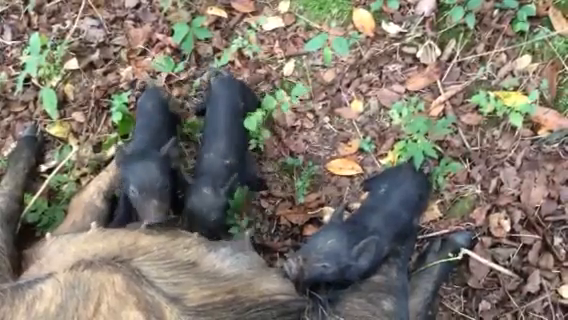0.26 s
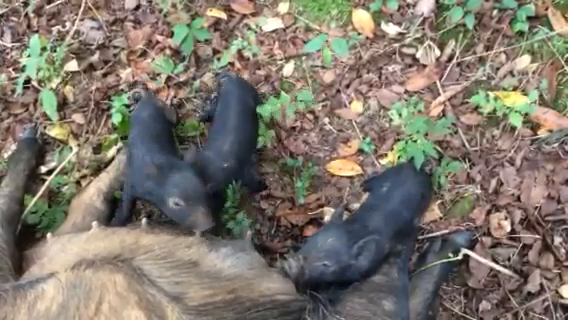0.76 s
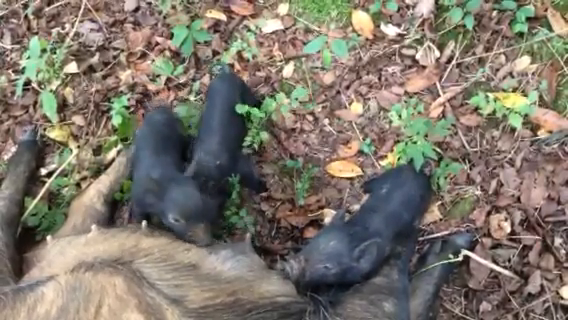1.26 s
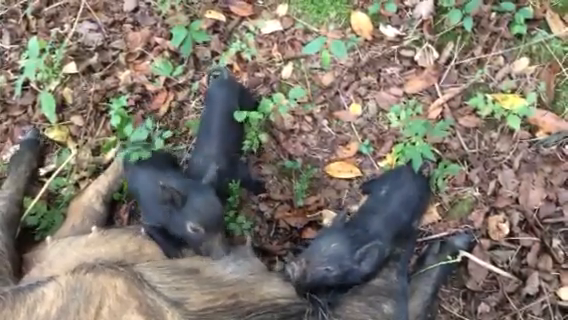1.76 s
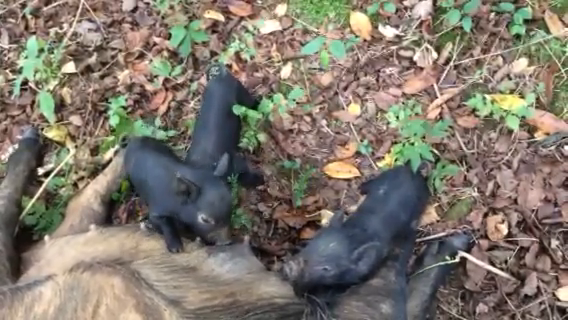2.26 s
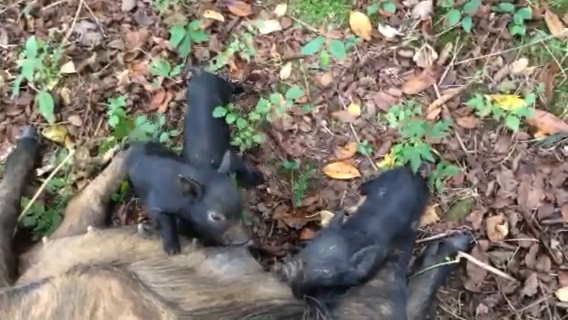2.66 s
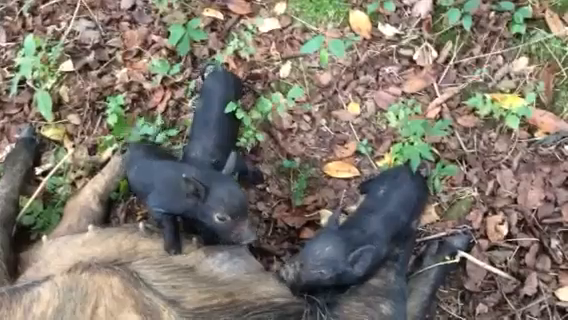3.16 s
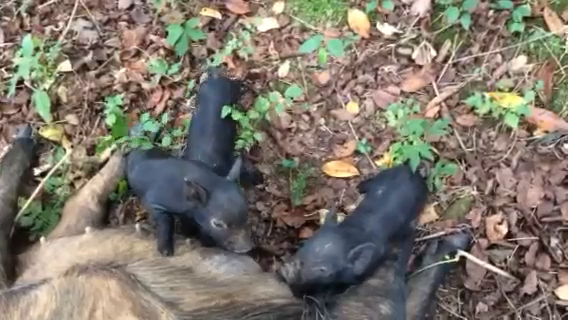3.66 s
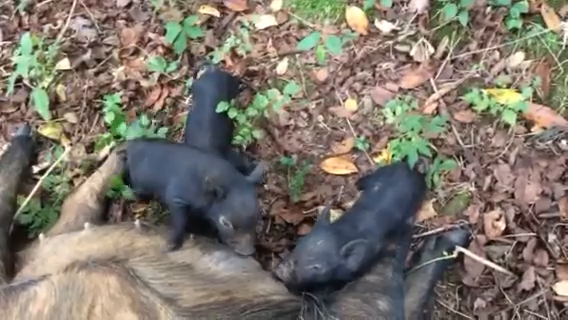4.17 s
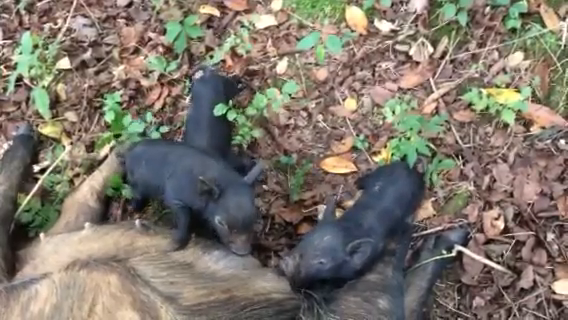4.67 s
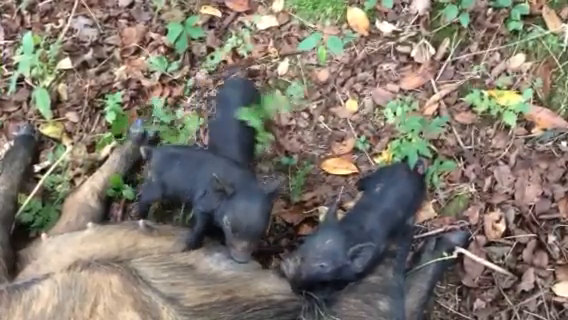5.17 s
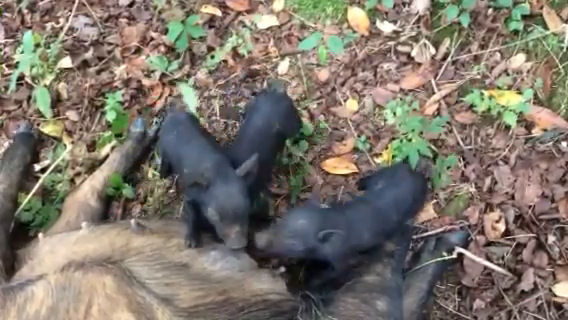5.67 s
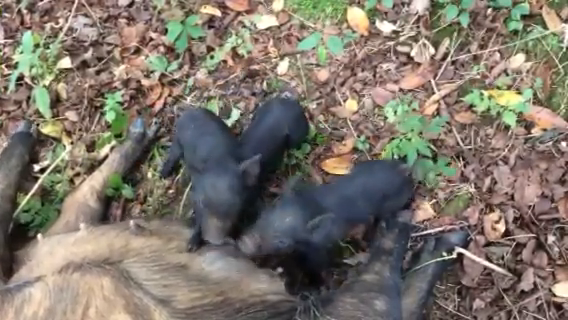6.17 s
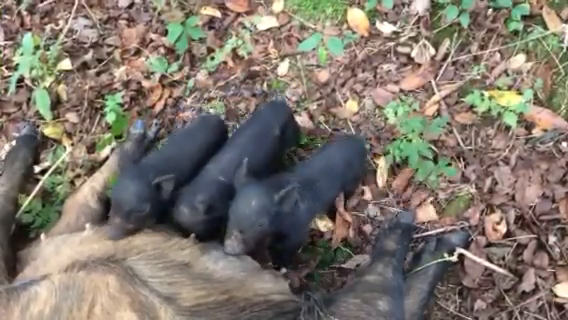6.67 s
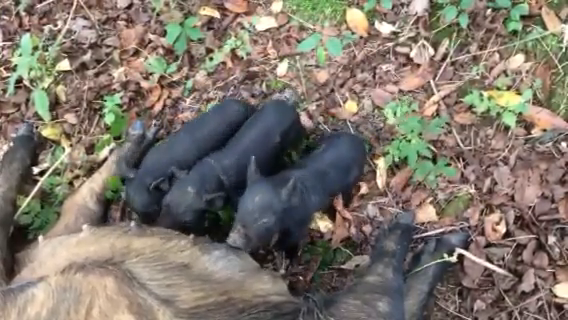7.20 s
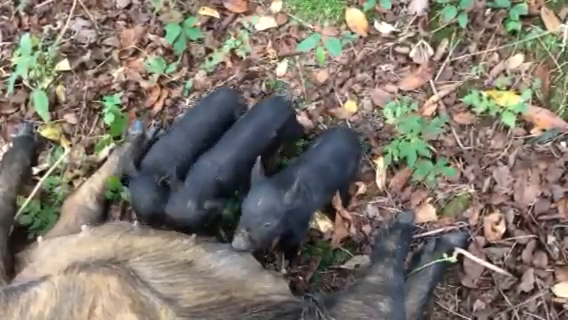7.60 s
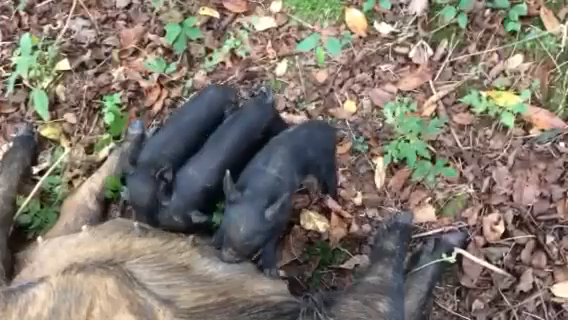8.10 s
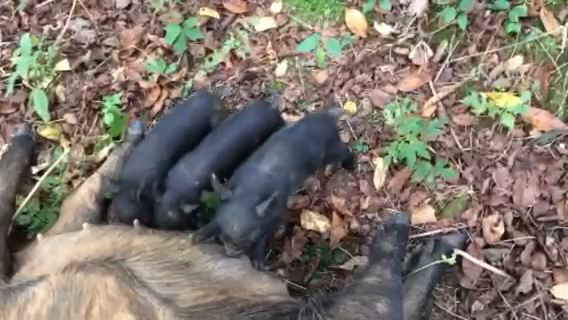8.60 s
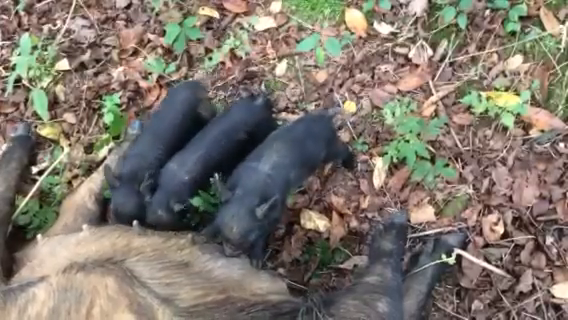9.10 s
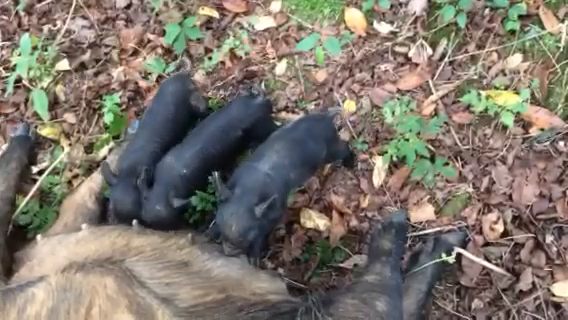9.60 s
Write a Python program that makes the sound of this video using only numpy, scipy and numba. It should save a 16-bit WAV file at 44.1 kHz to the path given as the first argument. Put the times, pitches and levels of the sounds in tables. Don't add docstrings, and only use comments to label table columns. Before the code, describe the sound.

Throughout, a dense, steady cicada hiss, brightest around 7 to 8 kHz, hangs over quiet low air and a very faint far machinery hum. From 0 seconds twigs snap and dry leaves rustle close to the phone under small hooves. Birds whistle softly at 0.3 to 0.6 seconds, and a short breathy grunt comes at 1.3, with a scuff just after. A rustle peaks at 2.6; a six-syllable high trill runs from 2.9 to 3.5. Faint dove-like calls sound at 4.4, 5.0 and 5.8, among more whistles. Stirring surges at 5.3 and again from 6.0 to 6.9, with a very sharp leaf crack at 6.2, small grunts from 5.6 and peeps at 6.0 and 6.6. Quick low grunts cluster at 7.1 to 7.7, ending with a hard smack. Another leafy burst comes at 8.3, a soft peep at 8.7, then lighter rustles and a quick warble near 9.4.

```python
import sys
import numpy as np
from scipy import signal
from scipy.fft import rfft, irfft
from scipy.io import wavfile
from scipy.ndimage import uniform_filter1d
from numba import njit

SR = 44100
rng = np.random.default_rng(int(sys.argv[2]) if len(sys.argv) > 2 else 0)


def boost(x):
    u = np.asarray(x, float) / 20
    return 10 ** u


def wrap_up_sound(samples):
    columns = np.atleast_2d(samples).T
    tamed = np.clip(columns, -1, 1)
    steps = np.round(tamed * 32767).astype(np.int16)
    wavfile.write(sys.argv[1], SR, steps)


N = 434385

# frequency in Hz, density in dB per Hz.
CICADA_SPECTRUM = [(3410, -37), (5800, -32), (6170, -27), (6620, -9), (6890, -0.5), (7330, 4), (7670, 2),
                   (8360, -9), (9190, -26.5), (9620, -30.5), (10700, -30.5), (12800, -34), (14500, -16),
                   (15500, -29.5)]
# frequency in Hz, density in dB per Hz.
AIR_SPECTRUM = [(15, -30), (25, -17.5), (49, -7), (70, -2.5), (197, -5.5), (259, -9), (366, -6.5),
                (695, -17.5), (1050, -17.5), (1590, -21), (2450, -22.5), (3090, -24.5), (3540, -26),
                (4880, -29.5), (6000, -29.5), (7800, -55), (13200, -120)]
# line in Hz, level in dB, wander in Hz.
MACHINE_LINES = [(59.4, -71.5, 0.49), (86.3, -76, 2.93), (119.4, -76.5, 0.53), (187.3, -83.5, 1.935),
                 (361, -87, 0.45)]

# time in seconds, treble rustle in dB.
UNREST = [(0, -77), (.9, -79), (1.6, -76), (2.1, -83), (3.3, -79), (4.6, -80), (5.2, -73.5), (5.5, -68.5),
          (6.0, -82), (6.6, -68.5), (7.1, -73.5), (7.55, -78), (7.8, -64.5), (8.2, -72.5), (8.9, -75.5),
          (9.85, -76)]
# loudest at in seconds, treble rustle in dB,
# swell from -12 dB in seconds, middle minus treble in dB.
STIRS = [(.224, -73.5, 0.5, -8), (.38, -70.5, 0.3, -5), (.99, -73, 0.2, -6), (1.17, -71.5, 0.22, -5),
         (1.457, -62, 0.07, -3.5), (1.65, -68, -0.06, -1), (1.8, -71.5, 0, -3), (2.41, -75, 0.5, -11),
         (2.579, -60, .055, -8.5), (3.637, -71, 0.24, -8), (3.99, -72, -0.14, -6),
         (4.161, -67.5, 0.2, -4.5), (4.33, -72, 0, -5), (4.52, -68, -0.44, -5), (4.95, -72, 0, -5),
         (5.305, -57.5, 0.0569, -5), (5.737, -72, 0.37, -2), (5.95, -70, 0.22, -1.5),
         (6.066, -60.5, .05, -5.5), (6.226, -62.5, 0, -7), (6.351, -61.5, 0.13, -4), (6.429, -55, 0.08, -5),
         (6.55, -66.5, 0.13, -3), (6.67, -63.5, 0.16, -5.5), (6.849, -62.5, 0.08, -6), (7.53, -72, 0.2, -4),
         (8.012, -67, .05, -7), (8.325, -55, 0.08, -8.5), (8.73, -68, 0.23, -10), (9.264, -70, 0.43, -4.5)]

# start in seconds, peak in dB, ring in Hz.
TWIGS = [(0.0745, -38, 4160), (0.2173, -43, 3600), (0.4723, -50.5, 2320), (0.766, -50, 3400),
         (1.0765, -53, 5250), (1.601, -48, 2960), (1.7355, -50, 5670), (3.412, -53.5, 3700),
         (3.5608, -55, 4430), (3.59, -56, 2950), (3.639, -47.5, 5580), (3.705, -49.5, 5030),
         (4.1035, -53, 2610), (4.31, -45, 5410), (4.3326, -52, 5690), (4.3535, -49.5, 5910),
         (6.134, -49, 5000), (6.1928, -52, 3420), (6.4847, -51, 5500), (6.684, -49, 2350),
         (6.7384, -51, 2580), (6.8068, -50, 2580), (6.9556, -39, 4700), (7.1222, -50, 2790),
         (7.3988, -48, 4080), (4.311, -54, 2500), (4.335, -55, 2900), (4.278, -58, 2500), (4.66, -56, 2700),
         (9.218, -56, 2100), (8.219, -57, 3800), (7.3986, -50, 2600), (2.87, -55, 2450),
         (6.0666, -48, 3630), (6.2208, -51, 2880), (6.8433, -50, 4640), (7.1, -56, 2700),
         (7.157, -57, 3500), (7.34, -56, 3500), (7.5143, -57, 2300), (6.0531, -52, 5390),
         (1.038, -55, 4900), (1.093, -55, 2800), (7.795, -50, 2660), (8.2407, -53, 4300),
         (8.9316, -56, 3990), (9.1277, -51, 3210)]
# start in seconds, peak in dB, ring in Hz.
LEAVES = [(0.2608, -49.5, 12600), (0.9834, -42, 10200), (2.3989, -48, 11000), (3.6386, -46, 13400),
          (4.0891, -50, 9440), (5.3915, -41, 11100), (6.0536, -53, 12800), (6.22, -28, 10600),
          (6.2252, -37, 12500), (6.432, -36, 12900), (7.711, -39, 9780), (8.3125, -41, 12600),
          (9.2643, -46, 9350)]
# start in seconds, peak in dB, ring in Hz.
SMACKS = [(0.265, -52.5, 1130), (0.44, -64, 850), (0.664, -64, 800), (1.45, -51, 1080), (1.485, -56, 337),
          (1.484, -53, 1250), (2.596, -65, 301), (3.634, -57.5, 926), (3.775, -61.5, 900),
          (4.023, -62, 337), (4.023, -56.5, 1120), (4.724, -51.5, 1050), (4.8653, -58.5, 2490),
          (4.9087, -57, 2700), (5.041, -58, 795), (5.872, -47, 900), (5.875, -44, 1040), (6.162, -57, 1060),
          (6.755, -60, 352), (7.514, -66, 349), (7.516, -60, 1100), (7.122, -61, 1200), (7.399, -62, 1200),
          (7.254, -63, 980), (7.709, -46.5, 1150), (7.7093, -34, 2500), (7.7095, -41, 3550),
          (6.382, -56, 1850)]
# start in seconds,
# peak in dB, centre in Hz, t60 in seconds.
SCUFFS = [(1.44, -48, 2900, 0.091), (1.48, -62, 2500, 0.087), (4.14, -47, 4220, 0.16),
          (4.452, -56, 4500, 0.23), (4.612, -49.5, 3200, 0.22), (4.7, -56, 2590, 0.088),
          (4.77, -60, 3900, 0.21), (4.83, -54, 3000, 0.068), (5.29, -39.5, 4200, .09),
          (5.312, -39.5, 3200, 0.12), (6.41, -49, 3100, .1), (7.7098, -37, 5600, 0.006),
          (7.712, -52, 420, .025), (8.305, -54, 3500, 0.14), (8.33, -47, 5000, .06),
          (8.57, -61, 1300, 0.23), (8.745, -59, 1300, 0.16), (9.03, -57, 1090, 0.23),
          (9.05, -55, 3200, 0.15)]

# start in seconds, length in seconds, first Hz, last Hz, peak in dB.
WHISTLER_NOTES = [
    (.342, 0.028, 2687, 2620, -60.5),
    (0.629, 0.077, 3170, 3570, -54.5),
    (1.497, 0.078, 2860, 3114, -59),
    (1.577, .045, 3130, 3040, -72),
    (2.467, 0.11, 2570, 2685, -69),
    (2.564, .135, 2695, 2577, -70),
    (5.183, 0.023, 2700, 2610, -61),
    (5.755, .045, 2950, 3180, -64),
    (5.8, 0.078, 3170, 3500, -57),
]
WARBLER_NOTES = [(.322, .02, 3000, 2750, -65), (.588, 0.027, 2910, 3510, -65),
                 (5.163, 0.022, 2900, 2730, -65), (7.28, .09, 2980, 2750, -77),
                 (7.425, .04, 2800, 2950, -76), (7.525, .055, 3200, 2950, -76),
                 (.295, 0.043, 2430, 2320, -76), (.405, 0.031, 2145, 2070, -66.5),
                 (.462, 0.034, 2100, 2390, -70), (.497, 0.1, 2396, 2860, -75),
                 (.578, 0.055, 2480, 1960, -71), (5.24, 0.024, 2130, 2010, -67),
                 (5.35, 0.034, 2800, 2450, -69), (5.385, .055, 2480, 2440, -71),
                 (5.44, 0.027, 2410, 1990, -65.5), (5.49, 0.041, 2070, 2160, -71),
                 (9.354, .018, 3780, 3100, -63), (9.385, 0.037, 3040, 2900, -73),
                 (9.42, .045, 2050, 2950, -63), (9.508, .032, 3280, 3080, -65),
                 (9.575, 0.044, 2900, 2540, -63.5), (9.62, .042, 2520, 1880, -67)]
CHIPPER_NOTES = [
    (4.762, .025, 3650, 3750, -71),
    (4.77, .035, 4150, 4000, -73),
    (4.78, .02, 3250, 3050, -75),
    (2.12, .05, 4550, 4650, -77),
    (2.175, 0.034, 3696, 3710, -64),
    (2.208, .018, 3590, 3180, -66),
    (2.226, 0.019, 3180, 3690, -68),
    (8.42, .025, 3680, 3390, -70),
    (8.965, .03, 5030, 4850, -75),
]
# share of the glide done when loudest if rising, the same if falling,
# loudest at share of length, start and end in dB against the peak.
WHISTLER_SHAPE = (0.6, .9, 0.6, -5, -8)
WARBLER_SHAPE = (.72, .72, .65, -3.5, -5)
CHIPPER_SHAPE = (0.8, 0.5, 0.5, -7, -3)
# time after its start in seconds, frequency in Hz, level in dB.
DOVE_ARCH = [(0, 1370, -4), (.035, 1513, 3), (.085, 1230, -5)]
# start in seconds, level in dB.
DOVE_CALLS = [
    (4.385, -77),
    (4.963, -77),
    (5.767, -73),
]
# time after its start in seconds, frequency in Hz, level in dB.
TRILL_SLUR = [(0, 4500, -13), (.007, 3950, -10), (.016, 3570, -9), (.028, 3300, -10)]
TRILL_HOOK = [(.026, 4150, -6), (.036, 4570, -4), (.062, 4570, -2), (.082, 4510, -9)]
# start in seconds, level in dB, pitch factor.
TRILL = [
    (2.907, -63, 1.0),
    (3.011, -62, 1.0),
    (3.112, -65, 1.0),
    (3.214, -63, .995),
    (3.318, -63, .99),
    (3.422, -67, .985),
]

# start in seconds, length in seconds, peak in dB, vocal pulses in Hz, throat in Hz.
GRUMBLES = [(1.335, 0.094, -60.5, 305, 313), (4.27, 0.046, -65.5, 180.7, 358), (5.81, 0.031, -59, 122, 340),
            (5.84, 0.036, -55.5, 144, 260), (6.4, 0.023, -60, 94, 280), (7.148, 0.017, -59.5, 130, 363),
            (7.42, 0.017, -65.5, 115.6, 450), (7.528, 0.023, -60, 171, 330),
            (7.548, 0.023, -62.5, 191, 500), (7.612, 0.025, -60.5, 169.6, 520),
            (7.65, 0.041, -61, 180, 497), (7.678, .02, -58, 146, 360), (5.855, 0.0405, -62, 70, 507)]
SNORTS = [
    (1.3375, .06, -55.5, 89, 370),
    (1.398, .022, -66, 120, 400),
    (5.636, 0.0295, -68, 55, 650),
    (6.345, .04, -62.5, 40, 600),
    (5.785, 0.0263, -66, 85, 580),
]
PEEPS = [
    (1.395, 0.032, -58.5, 136, 135),
    (6.02, 0.043, -57, 229, 240),
    (6.025, .035, -66, 227, 640),
    (6.622, .062, -56.5, 220.6, 226),
    (6.65, .04, -57.5, 205.2, 400),
    (6.63, 0.051, -62.5, 220.7, 750),
    (8.66, 0.057, -67, 197, 231),
    (6.323, .032, -61, 270, 520),
]
# pitch sag as a share, mouth opening in dB, loudest at share of length,
# start and end in dB against the peak.
SNORT_SHAPE = (0.1, 2, 3, -9, 2)
PEEP_SHAPE = (.3, -21, .6, -7, -4)
GRUMBLE_SHAPE = (0.6, -35, 1, -6.5, -2.5)
# frequency in Hz, width in Hz, level in dB.
MOUTH_RESONANCES = [(1200, 240, 0), (2560, 210, -4), (480, 220, -4), (3600, 400, -16), (4750, 500, -17),
                    (1900, 500, -16)]


def level(x, db):
    return x * boost(db) / np.sqrt(np.mean(x ** 2))


def walk(rate):
    hold = int(SR / rate)
    steps = np.repeat(rng.standard_normal(N // hold + 1), hold)
    return 1.32 * uniform_filter1d(uniform_filter1d(steps, hold), hold)[:N]


def colour(x, spectrum):
    hz, db = np.transpose(spectrum)
    bins = np.log(np.arange(N // 2 + 1) * SR / N + 1)
    return irfft(rfft(x) * boost(np.interp(bins, np.log(hz), db, left=-80, right=-80)), N)


@njit
def band(x, hz, width):
    y, b, l = np.empty(len(x)), 0., 0.
    for i in range(len(x)):
        g, k = np.tan(np.pi * hz[i] / SR), width[i] / hz[i]
        v = (b + g * (x[i] - l)) / (1 + g * (g + k))
        b, l, y[i] = 2 * v - b, l + 2 * g * v, k * v
    return y


def fixed_band(x, hz, width):
    return band(x, np.full(len(x), 1. * hz), np.full(len(x), 1. * width))


def swell(s, length, db, loudest, start_db, end_db):
    share = np.array([0, np.clip(loudest, .05, .95), 1])
    return s + share * length, db + np.array([start_db, 0, end_db]), share


def call(rows, fade_s):
    s, *columns = np.transpose(rows)
    at = np.arange(int((s[0] - fade_s) * SR), int((s[-1] + fade_s) * SR))
    edge = np.clip(np.minimum(at - at[0], at[-1] - at) / (2 * fade_s * SR), 0, 1)
    return at, [np.interp(at / SR, s, c) for c in columns], np.sin(np.pi / 2 * edge) ** 2


def insects(chorus_db=-49.5, flicker_db=.25):
    hiss = level(colour(rng.standard_normal(N), CICADA_SPECTRUM), 0) * boost(flicker_db * walk(24))
    cricket = level(fixed_band(rng.standard_normal(N), hz=8102, width=30), -69)
    return hiss * boost(chorus_db) + cricket


def distance(air_db=-69, swell_db=.4):
    out = level(colour(rng.standard_normal(N), AIR_SPECTRUM), air_db) * boost(swell_db * walk(3.5))
    for hz, db, wander_hz in MACHINE_LINES:
        loudness = np.sqrt(2) * boost(db + 1.8 * walk(5))
        turns = np.cumsum(hz + wander_hz * walk(5)) / SR
        out += loudness * np.sin(2 * np.pi * turns)
    return out


def stirring(unrest_middle_db=-5, fall=.9):
    t = np.arange(0, N + 64, 64) / SR
    treble = boost(np.interp(t, *np.transpose(UNREST))) ** 2
    middle = treble * boost(unrest_middle_db) ** 2
    for s, db, swell_s, middle_db in STIRS:
        away_s = np.where(t < s, s - t, (t - s) / fall)
        power = boost(db - 12 * away_s / max(swell_s, .01)) ** 2
        treble = treble + power
        middle = middle + power * boost(middle_db) ** 2
    return [np.interp(np.arange(N) / SR, t, 10 * np.log10(p)) for p in (treble, middle)]


def litter(snaps_per_s=3500, spread_db=2.2, shared_db=1.5, own_db=1.5):
    treble_db, middle_db = stirring()
    layers = [(treble_db, [(6000, -24), (9000, 1), (13500, -0.5), (15500, -8.0)], 2.5),
              (middle_db, [(1800, -4), (2600, 2), (6000, 1.5), (9000, -0.5)], 7),
              (middle_db, [(500, -2), (1000, 3.0), (1900, 0.5), (2600, -21)], -4)]
    out, stir = 0, shared_db * walk(40)
    for db, shape, add_db in layers:
        size = boost(spread_db * np.minimum(rng.exponential(size=N), 4))
        snaps = (rng.random(N) < snaps_per_s / SR) * rng.standard_normal(N) * size
        rustle_db = db + stir + own_db * walk(25)
        out = out + boost(rustle_db) * level(colour(snaps, shape), add_db)
    return out


def cracks(events, width_share, fizz, snap=1, attack_s=0):
    out, t = np.zeros(N + SR), np.arange(SR // 6) / SR
    for s, db, hz, t60 in events:
        push = fizz * rng.standard_normal(len(t)) * boost(-60 * t / np.clip(t60, .003, .2))
        push *= np.clip(t / (attack_s + 1 / SR), 0, 1)
        push[0] = snap
        ring = fixed_band(fixed_band(push, hz, width_share * hz), hz, 2 * width_share * hz)
        start = int((s + 0.000984) * SR)
        out[start:start + len(t)] += boost(db) * ring / np.max(np.abs(ring))
    return out[:N]


def footfalls():
    twigs = cracks([(*e, .012) for e in TWIGS], 0.39, 0.41)
    leaves = cracks([(*e, .008) for e in LEAVES], 0.42, 0.99)
    smacks = cracks([(*e, .014) for e in SMACKS], 0.25, 0.37)
    scuffs = cracks(SCUFFS, 0.93, 1, snap=0, attack_s=.006)
    return twigs + leaves + smacks + scuffs


def gliding_notes(notes, bird_shape):
    rising, falling, *shape = bird_shape
    for s, length, first_hz, last_hz, db in notes:
        times, levels, _ = swell(s, length, db, *shape)
        glide = np.array([0, rising if last_hz > first_hz else falling, 1])
        yield np.transpose([times, first_hz + (last_hz - first_hz) * glide, levels])


def wood_echo():
    t, echo = np.arange(SR) / SR, 0
    for t60, db in ((.55, -6), (.18, -6.5)):
        scatter = rng.standard_normal(SR) * boost(-60 * t / t60) * np.clip(t / 0.015, 0, 1)
        echo = echo + boost(db) * level(scatter, 0) / np.sqrt(SR)
    return echo


def birds(waver=.008, tremble_db=1.7, hidden_db=-3.5):
    open_notes = [*gliding_notes(WHISTLER_NOTES, WHISTLER_SHAPE), *gliding_notes(CHIPPER_NOTES, CHIPPER_SHAPE)]
    open_notes += [[(s + t, hz, db + d) for t, hz, d in DOVE_ARCH] for s, db in DOVE_CALLS]
    for s, db, sag in TRILL:
        for part in (TRILL_SLUR, TRILL_HOOK):
            open_notes.append([(s + t, hz * sag, db + d) for t, hz, d in part])
    hidden_notes = gliding_notes(WARBLER_NOTES, WARBLER_SHAPE)
    sung, direct, drift = np.zeros(N), np.zeros(N), 1 + waver * walk(90)
    for notes, direct_db in ((open_notes, 0), (hidden_notes, hidden_db)):
        for rows in notes:
            at, (hz, db), edge = call(rows, fade_s=.004)
            note = np.sqrt(2) * boost(db) * edge * np.sin(2 * np.pi * np.cumsum(hz * drift[at]) / SR)
            sung[at] += note
            direct[at] += note * boost(direct_db)
    tremble = boost(tremble_db * walk(70))
    return direct * tremble + signal.fftconvolve(sung * tremble, wood_echo())[:N]


def grunt_rows(mouth_per_effort=.48):
    kinds = ((GRUMBLES, GRUMBLE_SHAPE), (SNORTS, SNORT_SHAPE), (PEEPS, PEEP_SHAPE))
    for calls, (sag, mouth_db, *shape) in kinds:
        for s, length, db, hz, throat_hz in calls:
            times, levels, share = swell(s, length, db, *shape)
            pulse_hz = hz * (1 + sag * (.5 - share))
            mouth = mouth_db + mouth_per_effort * (levels - db)
            yield np.transpose([times, pulse_hz, levels, 0 * share + throat_hz, mouth])


def grunts(jitter=.045, shimmer_db=2.2, breath=.45, throat_share=.45):
    out = np.zeros(N)
    for rows in grunt_rows():
        at, (hz, db, throat_hz, mouth_db), edge = call(rows, fade_s=0.00394)
        chance = rng.standard_normal((2, 64))
        cycle = np.cumsum(hz / SR) + .5
        cycle = np.cumsum(hz * (1 + jitter * chance[0, cycle.astype(int)]) / SR) + .65
        pulses = np.diff(np.floor(cycle), prepend=0) * boost(shimmer_db * chance[1, cycle.astype(int)])
        pulses += breath * np.exp(-(cycle % 1) / 0.44) * rng.standard_normal(len(at)) * np.sqrt(hz / SR)
        width = throat_share * throat_hz
        throat = band(band(pulses, throat_hz, width), throat_hz, 2 * width)
        mouth = sum(boost(g) * fixed_band(fixed_band(pulses, f, w), f, 1.15 * w)
                    for f, w, g in MOUTH_RESONANCES)
        out[at] += boost(db) * edge * (level(throat, 0) + boost(mouth_db) * level(mouth, 0))
    return out


def scene():
    return (insects() + distance() + litter() + footfalls() + birds() + grunts())[None]


def band_limit(x):
    return signal.sosfilt(signal.butter(12, 16210, fs=SR, output="sos"), x)


def record(dry):
    top_cut = signal.ellip(10, .2, 45, 15270, fs=SR, output="sos")
    mix = signal.sosfilt(top_cut, dry)
    return band_limit(mix)


dry = scene()
out = record(dry)
wrap_up_sound(out)
```